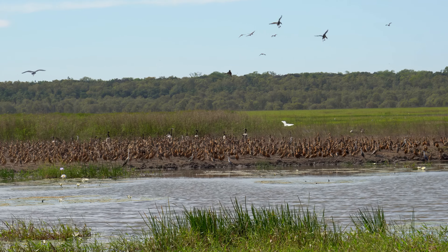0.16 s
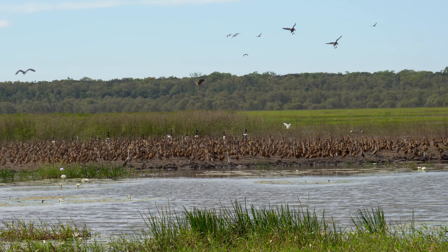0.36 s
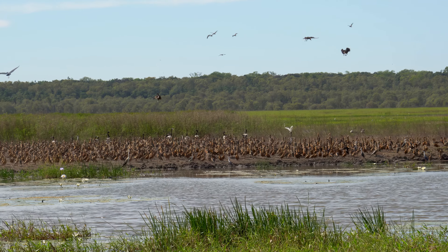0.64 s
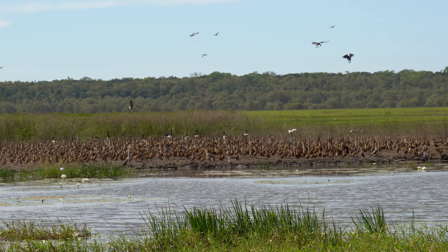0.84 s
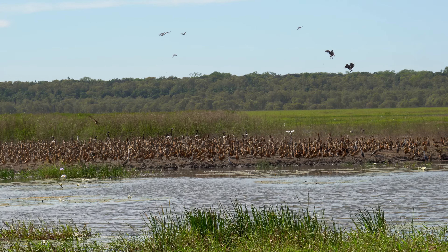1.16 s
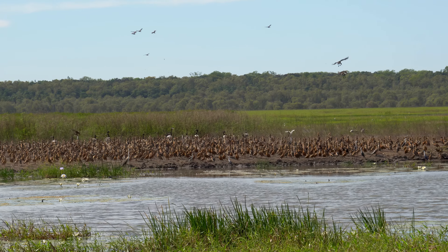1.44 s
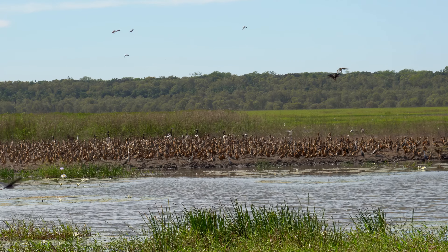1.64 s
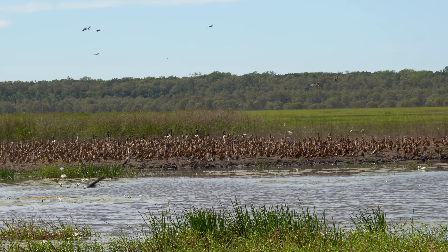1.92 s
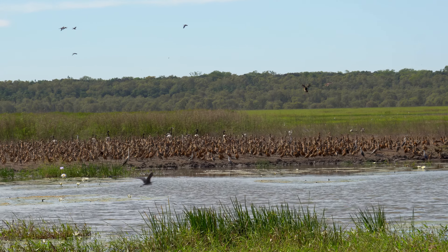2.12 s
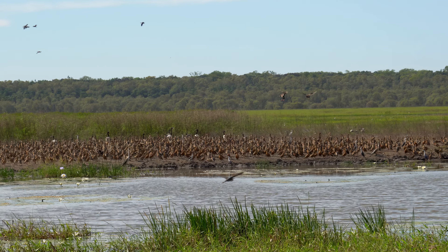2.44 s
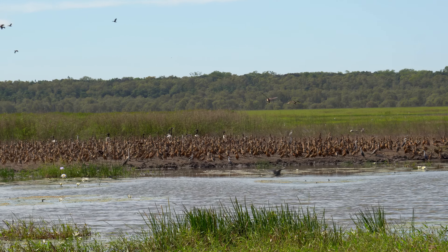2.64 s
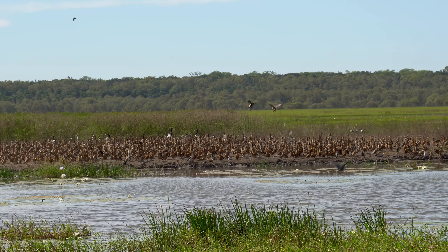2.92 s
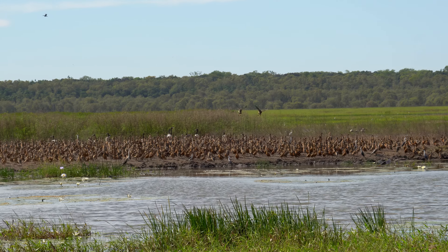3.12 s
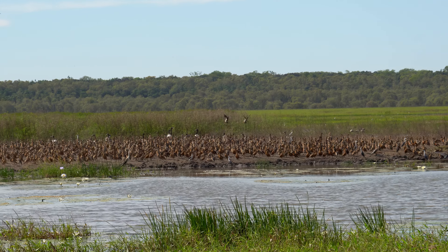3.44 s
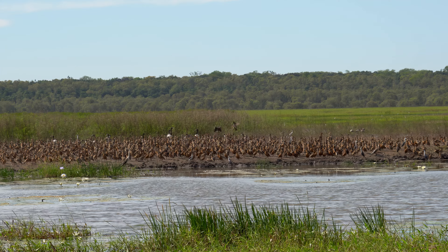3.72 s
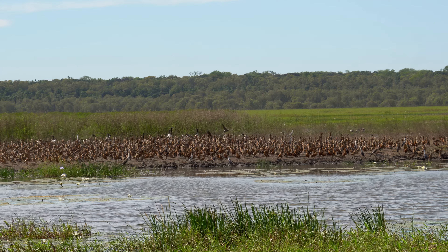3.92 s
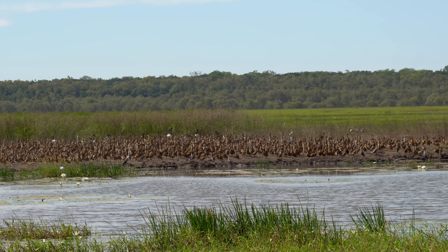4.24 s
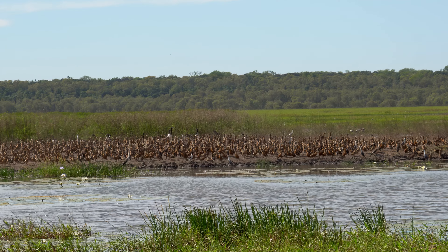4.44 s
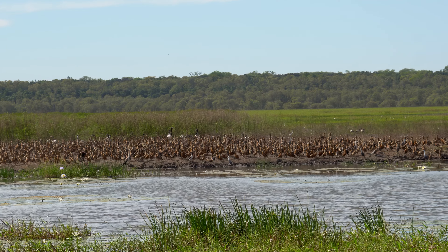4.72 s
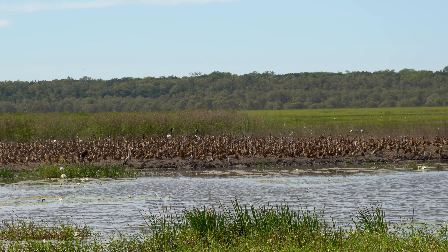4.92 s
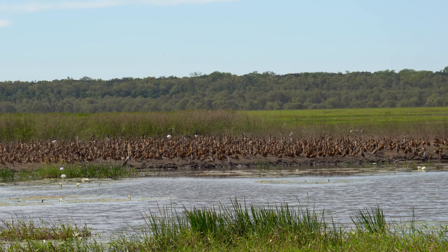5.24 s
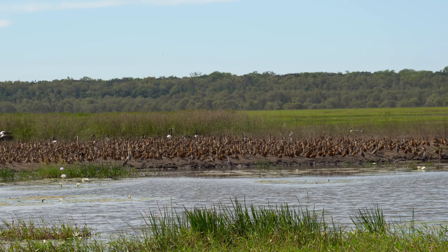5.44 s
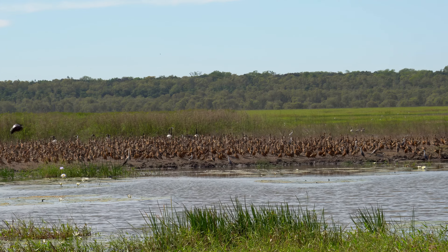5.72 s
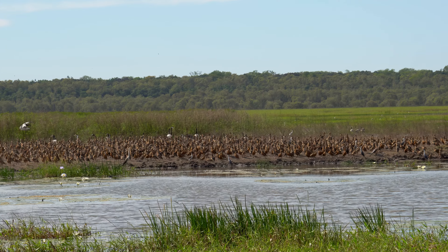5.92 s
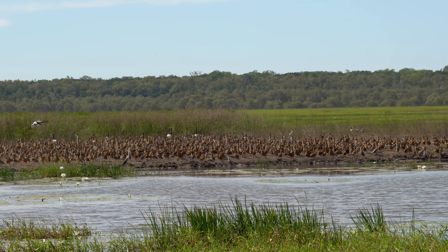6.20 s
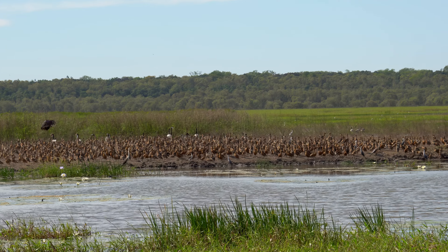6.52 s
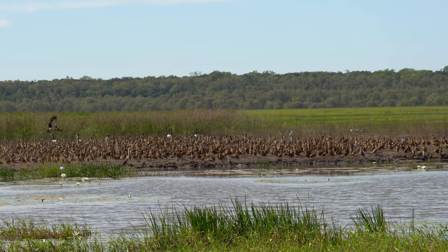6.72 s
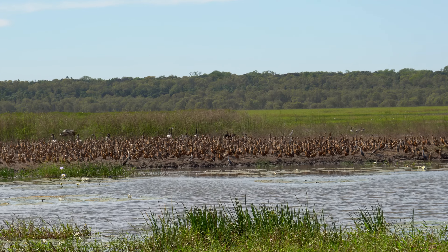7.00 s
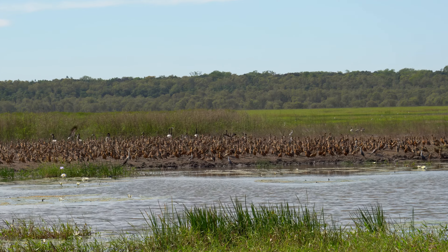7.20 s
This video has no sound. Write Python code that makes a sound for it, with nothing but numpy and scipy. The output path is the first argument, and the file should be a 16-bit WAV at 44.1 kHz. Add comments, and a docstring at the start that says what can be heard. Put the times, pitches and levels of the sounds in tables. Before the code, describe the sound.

Hundreds of ducks chip and whistle at once at an open wetland, nearest voices sharp and clear, with breeze rumbling softly on the microphone.

```python
"""Whistling ducks across open water

A huge flock rests on a mud bank: near birds twitter in arched chips and long rising-and-falling whistles,
each a nearly pure voice on a bending pitch; hundreds of scattered calls merge into a duller crowd behind.
Far waterbirds hoot, honk, chip and gabble from voices of a few partials. Shaped noise makes the breeze's
rumble on the microphone, a faint far drone and the steady air.
"""
import sys
import numpy as np
from scipy import signal
from scipy.fft import rfft, irfft
from scipy.io import wavfile

SR = 44100
rng = np.random.default_rng(int(sys.argv[2]) if len(sys.argv) > 2 else 0)


def digitize_waveform(pressure):
    """Quantize a signal to 16-bit integers and store it at the path in sys.argv[1].

    Rows of a 2-D input are taken as channels; values are limited to [-1, 1].
    """
    field = np.atleast_2d(pressure).T
    bounded = np.clip(field, -1, 1)
    quanta = np.round(bounded * 32767).astype(np.int16)
    wavfile.write(sys.argv[1], SR, quanta)


N = 324576
TIME = np.arange(N) / SR

# The crowd's swell and sink. Each row: time in seconds, drive of the high voices in dB, drive of the low in dB.
CROWD = [(0.0, -43, -54.5), (1.27, -40, -49), (1.73, -42.5, -51), (2.19, -41.5, -56), (2.53, -46, -50.5),
         (2.88, -35, -49.5), (2.99, -42.5, -45.5), (3.68, -39, -52.5), (3.8, -46, -53.5), (4.25, -40, -47),
         (4.6, -43.5, -51.5), (4.71, -39.5, -49.5), (5.64, -42.4, -50.5), (5.87, -49, -52.5),
         (6.21, -39, -45.5), (7.02, -40.5, -52), (7.13, -53, -54), (7.36, -39, -57.1)]
# Colour of the crowd after crossing the water. Each row: frequency in Hz, gain in dB.
CROWD_COLOUR = [(1200, 13), (1700, -1), (2150, 2.5), (3000, 3.5), (3600, 5), (4800, 3), (5600, 4.5),
                (6600, 0.5), (9000, -3), (12000, -5), (15000, -14)]
# A soft gabble of distant waterbirds. Each row: time in seconds, level in dB.
GABBLE = [(0, -59), (1.2, -61.5), (1.62, -58), (2.1, -64), (3.8, -62), (4.3, -61.5), (5.4, -61), (6.2, -64),
          (7.36, -67)]
# Strength of the breeze. Each row: time in seconds, rumble level in dB before the eddies.
BREEZE = [(0.0, -31.5), (0.23, -30), (0.35, -25), (0.58, -32.5), (1.15, -28.5), (1.73, -35), (2.07, -30.5),
          (2.19, -42.5), (2.42, -40), (2.65, -33.5), (3.22, -37.5), (3.91, -35), (4.37, -40), (5.17, -29.5),
          (5.52, -29.5), (5.64, -35.5), (6.44, -40.8), (7.36, -33.5)]
# Spectral shape of the breeze's rumble. Each row: frequency in Hz, relative density in dB per Hz.
RUMBLE = [(8.8, -51), (15, -1), (32, 1), (60, -3.5), (104, -11), (500, -43), (650, -85), (1100, -120)]
# A faint far drone near 220 Hz. Each row: time in seconds, level in dB.
DRONE = [(0, -59.5), (3.8, -60), (4.4, -59.5), (5.6, -58.5), (6.2, -55), (6.8, -55), (7.36, -59.5)]
# Spectral shape of the wetland's steady wash and the microphone's hiss.
# Each row: frequency in Hz, relative density in dB per Hz.
AIR = [(100, 8.5), (400, -3), (560, -7.5), (720, -4.5), (890, -0.5), (1100, -3), (1600, -7), (3000, -5.5),
       (7000, -22), (12000, -23), (15000, -26.5)]
# Near birds stutter runs of chips. Each row: first chip in seconds, last chip in seconds, number of chips,
# first pitch in Hz, last pitch in Hz, first level in dB, last level in dB.
CHIP_RUNS = [(0.043, .389, 4, 4640, 4540, -25, -29), (0.067, .321, 4, 3470, 3345, -33.5, -38.5),
             (0.485, .605, 2, 4320, 4470, -26, -33), (0.576, .668, 2, 4260, 4010, -29.5, -34),
             (0.9, 1.156, 4, 4500, 4135, -29.5, -32.5), (0.934, 1.128, 3, 3990, 4410, -39, -33),
             (1.237, 1.325, 2, 3600, 3430, -36.5, -50), (1.317, 1.42, 2, 4660, 4850, -37, -34),
             (1.494, 1.607, 2, 3620, 3490, -35.5, -36), (1.581, 1.66, 2, 2740, 2600, -39.5, -60),
             (1.899, 2.112, 2, 6040, 5980, -45.5, -45), (1.938, 2.208, 4, 3610, 3860, -37.5, -41),
             (2.603, 2.981, 3, 4490, 4570, -36.5, -34.5), (2.605, 3.072, 5, 3474, 3685, -38.5, -31.5),
             (2.763, 2.88, 2, 4700, 4500, -36.5, -40), (3.534, 3.64, 2, 3490, 3620, -35.5, -37),
             (4.003, 4.187, 3, 3840, 3650, -30, -32.5), (4.131, 4.32, 3, 3960, 3850, -35.5, -31.5),
             (4.339, 4.505, 3, 3360, 3650, -35, -34.5), (4.982, 5.165, 3, 3720, 3850, -34, -39),
             (5.13, 5.403, 2, 6600, 5840, -45, -44), (5.213, 5.414, 3, 3640, 3730, -33, -59),
             (5.67, 5.873, 3, 3850, 3470, -38, -41.5), (5.754, 5.934, 3, 4800, 4780, -34.5, -33),
             (5.988, 6.1, 3, 3570, 3810, -37.5, -37.5), (6.197, 6.275, 2, 3700, 3800, -41, -34),
             (6.405, 6.51, 2, 3640, 3590, -32, -30), (6.484, 6.574, 2, 3930, 3950, -37, -34.5),
             (6.59, 6.692, 2, 5050, 4400, -40, -37), (7.148, 7.345, 3, 3590, 3660, -42, -43),
             (7.3, 7.35, 2, 4930, 4860, -38.5, -35.5)]
# Near whistles. Each row: time of the top in seconds, rise in seconds, fall in seconds, top pitch in Hz,
# end pitch in Hz, level in dB, overtone in dB against the main tone before it breaks up.
WHISTLES = [(.09, 0.055, 0.062, 5750, 4740, -49, -24), (.426, 0.13, 0.013, 5800, 5700, -41.5, -40),
            (.46, 0.0078, 0.063, 5850, 4800, -44, -36), (.705, .01, 0.073, 4010, 3020, -37, -18),
            (.731, 0.051, 0.016, 5450, 5170, -44, -16), (.779, 0.023, 0.065, 4820, 3790, -37, -27),
            (.955, .11, .15, 5260, 3630, -41, -25), (1.04, 0.0057, 0.13, 3920, 2065, -44.5, -20),
            (1.345, 0.11, 0.017, 5680, 5620, -42.5, -31), (1.44, 0.084, 0.14, 5030, 3400, -40, -25),
            (1.775, 0.053, 0.086, 5960, 4620, -42.5, -19), (1.9, .02, 0.11, 4980, 3360, -36, -18),
            (2.295, 0.1, 0.11, 6230, 4300, -45, -39), (2.302, .13, 0.038, 4940, 3350, -41, -38),
            (2.485, 0.04, .05, 5340, 4730, -49, -20), (2.56, 0.042, 0.13, 5630, 4180, -45.5, -14),
            (2.84, 0.0079, 0.093, 3300, 1990, -44, -30), (2.866, .034, 0.11, 5370, 4460, -41, -17),
            (2.91, 0.027, 0.12, 3760, 2930, -47, -13), (3.16, 0.026, .1, 4130, 3070, -40.5, -15),
            (3.255, 0.045, 0.076, 5080, 4470, -38, -27), (3.4, .06, 0.067, 5470, 4500, -47, -20),
            (3.575, 0.048, .015, 5800, 5630, -40, -34), (3.634, 0.021, 0.084, 5170, 4240, -38, -23),
            (3.709, .06, 0.17, 5140, 2430, -44, -41), (4.006, .04, 0.13, 5570, 4120, -45.5, -17.5),
            (4.305, 0.038, 0.049, 6030, 4700, -41, -33), (4.436, 0.05, 0.016, 6120, 5700, -37.5, -39),
            (4.462, .01, .09, 6000, 4560, -38.5, -39), (4.47, .05, .17, 4150, 2440, -45, -20),
            (4.8, .05, 0.088, 4880, 3650, -41, -31), (4.84, .02, 0.096, 4030, 3060, -43.5, -14),
            (4.91, .07, .14, 5330, 3460, -38.5, -18), (5.12, 0.05, .15, 4840, 2780, -46.5, -11),
            (5.3, 0.07, 0.065, 5560, 4830, -40.5, -34), (5.5, 0.044, 0.16, 5600, 3100, -39, -32),
            (5.575, 0.07, 0.1, 5920, 4100, -41, -36), (5.981, 0.058, 0.094, 6350, 4850, -45.5, -36),
            (6.164, .07, .12, 5710, 3810, -43, -24), (6.385, 0.029, 0.057, 5180, 4010, -37.5, -19.5),
            (6.653, 0.15, 0.042, 5100, 3750, -42.5, -43), (6.936, 0.093, 0.1, 5320, 4000, -42.5, -30),
            (7.02, 0.011, 0.16, 4700, 3400, -46, -35), (7.06, .01, .06, 5160, 4400, -44, -40),
            (7.22, 0.029, 0.053, 5420, 4400, -39, -40)]
# One far bird hoots now and then. Each row: middle of the hoot in seconds, level in dB.
HOOTS = [(.32, -57), (1.52, -62), (2.14, -55.5), (2.69, -60), (3.14, -58), (3.70, -60.5), (4.17, -56.5),
         (4.71, -55)]
# Far low calls, single or in even runs: honks, a few low-pitched chips near 1.5 kHz, faint hoots near 330-400 Hz.
# Each row: first call in seconds, number of calls, pitch in Hz, level in dB.
FAR_CALLS = [(.528, 1, 1626, -57), (1.55, 1, 873, -56.5), (1.62, 1, 630, -56.5), (1.98, 1, 1500, -60),
             (2.13, 1, 930, -57), (3.56, 1, 910, -59), (3.95, 5, 916, -54), (4.84, 1, 874, -56),
             (5.05, 5, 896, -53), (5.84, 4, 850, -57), (6.26, 1, 326.5, -54.5), (6.47, 1, 1510, -57),
             (6.475, 3, 856, -56), (6.952, 1, 345, -60), (7.109, 1, 398, -59)]

CHIP_REACH_S = .025   # from a chip's top to either end
CHIP_LEAD = .13   # the full-strength stretch is centred this share of the reach before the top
CHIP_BEND, BEND_SPREAD = .33, 0.0598   # share of pitch lost at the ends, averaged over both; its scatter
CLIMB_SHARE, CLIMB_S = .2, .08   # a rise of this length starts this share below the top; longer rises lower
TURN_ROUNDNESS = .24   # 0 = the pitch turns in a sharp point
EASE = .35   # how far a slur flattens towards its ends
HOOT_HZ, HOOT_S = 278, 0.13   # the unheard fundamental of the lone bird's hoot, and its length
CALL_GAP_S = .145   # between the far calls of a run
EDDY_DB, EDDIES_PER_S = 1.66, 7.2   # quick swings within a gust
AIR_LOSS_HZ = 8100   # the air dulls the near calls' overtones above this
CUTOFF_HZ = 15100


def from_db(db):
    """Decibels to gain."""
    return 10 ** (np.asarray(db) / 20)


def rms_one(x):
    """Scale to rms 1."""
    return x / np.sqrt(np.mean(x ** 2) + 1e-20)


def in_time(rows):
    """Each column of a curve at every sample."""
    s, *columns = np.transpose(rows)
    return [np.interp(TIME, s, column) for column in columns]


def span(start, end):
    """The samples between two times."""
    return slice(int(np.clip(start * SR, 0, N)), int(np.clip(end * SR, 0, N)))


def coloured(x, points):
    """Filter by a curve of Hz and dB, joined evenly over log frequency."""
    hz, db = np.transpose(points)
    bins = np.maximum(np.arange(N // 2 + 1) * SR / N, 1)
    gain = from_db(np.interp(np.log(bins), np.log(hz), db))
    return irfft(rfft(x) * gain, N)


def drift(rate):
    """Smooth chance that changes about rate times a second; spread 1."""
    r = np.exp(-40 * np.pi * rate / SR)   # two equal poles, run on every 20th sample
    noise = rng.standard_normal(N // 20 + 2002)
    slow = signal.lfilter([1], [1, -2 * r, r * r], noise)[2000:]   # drop the filter's run-in
    return np.interp(np.arange(N) / 20, np.arange(len(slow)), rms_one(slow))


def tone(hz, second_db, third_db):
    """A nearly pure voice on a pitch track, with two overtones."""
    phase = (2 * np.pi * np.cumsum(hz) / SR).astype(np.float32)
    return np.sin(phase) + from_db(second_db) * np.sin(2 * phase) + from_db(third_db) * np.sin(3 * phase)


def off_water(x, lag_s, echo_db):
    """A second path glances off the ripples, fading in and out a moment after the direct sound."""
    delayed = np.interp(TIME - lag_s, TIME, x, left=0)
    return x + from_db(echo_db) * drift(22.7) * delayed


def scatter(x, t60):
    """Reeds and the bank throw back a thin, quickly dying wash."""
    t = TIME[:SR]
    tail = rng.standard_normal(SR) * from_db(-60 * t / t60) * (1 - np.exp(-t / 0.022))
    return signal.fftconvolve(x, tail / np.sqrt(np.sum(tail ** 2)))[:N]


def chips(rows, waver, flutter_db, fade, overtone_db):
    """The pitch arches, dropping faster than it climbed; the voice jumps to full strength on the way up."""
    out = np.zeros(N)
    wobble = 1 + waver * drift(125)
    for s, top_hz, bend, db in rows:
        at = span(s - CHIP_REACH_S, s + CHIP_REACH_S)
        u = (TIME[at] - s) / CHIP_REACH_S   # -1 at the start, 0 at the top, 1 at the end
        body = .16 + .84 / (1 + np.abs((u + CHIP_LEAD) / fade) ** 14)
        swell = body * np.clip(4 * (1 - np.abs(u)), 0, 1)
        hz = top_hz * (1 - bend * u ** 2 * (1 + .3 * u))
        out[at] += from_db(db) * swell * tone(hz * wobble[at], overtone_db, overtone_db - 13)
    return out * from_db(flutter_db * drift(98))


def whistles(rows, waver, rasp, flutter_db, edge_s):
    """A long slur climbs to a rounded peak and slides down, easing off; the voice catches at the turn."""
    out = np.zeros(N)
    wobble = 1 + waver * drift(19.3) + rasp * drift(670)
    grain_db = 4 * drift(90) - 2   # the first overtone breaks up more than the main tone
    for top, rise, fall, top_hz, end_hz, db, overtone_db in rows:
        at = span(top - rise, top + fall)
        t = TIME[at] - top
        start_hz = top_hz * (1 - CLIMB_SHARE * np.sqrt(rise / CLIMB_S))
        away = np.interp(t, [-rise, 0, fall], [1, 0, 1])   # 0 at the top, 1 at either end
        slope = (np.hypot(away, TURN_ROUNDNESS) - TURN_ROUNDNESS) / (np.hypot(1, TURN_ROUNDNESS) - TURN_ROUNDNESS)
        edge_hz = np.where(t < 0, start_hz, end_hz)
        hz = top_hz + (edge_hz - top_hz) * slope * (1 + EASE * (1 - slope))
        catch_db = -3.6 * np.exp(-(t / 0.0023) ** 2)
        edges = np.clip(np.minimum(t + rise, fall - t) / edge_s, 0, 1)
        voice = tone(hz * wobble[at], overtone_db + grain_db[at], overtone_db - 22)
        out[at] += from_db(db + catch_db) * edges * voice
    return out * from_db(flutter_db * drift(50))


def crowd_chips(low_hz, high_hz, spread_db, overtone_db, count):
    """Each bird stutters a run of four chips, about ten a second, sinking a little in pitch."""
    late, pitch_a, pitch_b, depth, far, pause = rng.random((count, 6, 1)).transpose(1, 0, 2)
    step = np.arange(4)
    first_s = (np.arange(count)[:, None] + 3 * late) / count * N / SR
    s = (first_s + step * (.085 + .035 * pause)) % (N / SR)   # late chips wrap to the start
    # the mean of two draws favours the middle of the range
    pitch = (low_hz + (high_hz - low_hz) * (pitch_a + pitch_b) / 2) * (1 - 0.0201 * step)
    db = -spread_db * np.sqrt(far) + rng.normal(0, 2.0, (count, 4))
    rows = np.stack(np.broadcast_arrays(s, pitch, 0.121 + .36 * depth, db), axis=-1).reshape(-1, 4)
    return rms_one(chips(rows, waver=0.0079, flutter_db=3.0, fade=0.83, overtone_db=overtone_db))


def crowd_whistles(low_hz, high_hz, spread_db, overtone_db, count):
    """Slurs follow each other loosely and cross, each falling for longer than it rises."""
    late, pitch_a, pitch_b, depth, far = rng.random((count, 5)).T
    top = (np.arange(count) + 4 * late - 2) / count * N / SR
    length = .07 + .13 * depth
    pitch = low_hz + (high_hz - low_hz) * (pitch_a + pitch_b) / 2
    end_hz = pitch * (.84 - .2 * depth)   # longer slurs fall further
    db = -spread_db * np.sqrt(far)
    rows = np.c_[top, .36 * length, .64 * length, pitch, end_hz, db, overtone_db - 8 * pitch_a]
    return rms_one(whistles(rows, waver=0.01373, rasp=0.0066, flutter_db=3.0, edge_s=0.025))


def crowd():
    """High and low voices merge by sheer number, then take on the colour of the water crossing."""
    high_db, low_db = in_time(CROWD)
    high = from_db(-9) * crowd_chips(low_hz=3102, high_hz=4800, spread_db=12.5, overtone_db=-22, count=140)
    high += from_db(-6) * crowd_whistles(low_hz=3400, high_hz=5850, spread_db=9, overtone_db=-20, count=240)
    # thin, shrill voices peep faintly among the rest
    high += from_db(-19) * crowd_chips(low_hz=4525, high_hz=7610, spread_db=6.0, overtone_db=-33, count=160)
    low = from_db(-3.0) * crowd_chips(low_hz=2013, high_hz=3200, spread_db=10.5, overtone_db=-4.5, count=120)
    low += from_db(-4) * crowd_whistles(low_hz=2400, high_hz=3500, spread_db=7, overtone_db=-22, count=130)
    return coloured(from_db(high_db) * high + from_db(low_db) * low, CROWD_COLOUR)


def gabble():
    """Many soft low notes overlap from far across the marsh."""
    level_db, = in_time(GABBLE)
    return from_db(level_db) * crowd_chips(low_hz=419.0, high_hz=1298.5, spread_db=6, overtone_db=-5, count=130)


def breeze():
    """Eddies on the microphone swell and sink with the gusts."""
    gust_db, = in_time(BREEZE)
    rumble = rms_one(coloured(rng.standard_normal(N), RUMBLE))
    return from_db(gust_db + EDDY_DB * drift(EDDIES_PER_S)) * rumble


def drone():
    """A narrow band of noise makes an unsteady low hum from far across the marsh."""
    level_db, = in_time(DRONE)
    band = signal.butter(2, [205, 235], "band", fs=SR, output="sos")
    return from_db(level_db) * rms_one(signal.sosfilt(band, rng.standard_normal(N)))


def steady_air():
    """Shaped noise gives the wash of the wetland and the microphone's hiss."""
    return from_db(-52.5) * rms_one(coloured(rng.standard_normal(N), AIR))


def near_chips():
    """Each bird repeats its chip evenly; pitch and strength slide from the first chip to the last."""
    runs = []
    for first_s, last_s, count, first_hz, last_hz, first_db, last_db in CHIP_RUNS:
        first, last = (first_s, first_hz, first_db), (last_s, last_hz, last_db)
        runs.append(np.linspace(first, last, int(round(count))))
    s, hz, db = np.concatenate(runs).T
    bend = CHIP_BEND + BEND_SPREAD * rng.standard_normal(len(s))
    return chips(np.c_[s, hz, bend, db], waver=0.0094, flutter_db=1.15, fade=0.53, overtone_db=-35.5)


def ducks():
    """Near callers stand clear of the duller crowd; water and bank reflect them all."""
    near = near_chips() + whistles(WHISTLES, waver=.007, rasp=.007, flutter_db=2.4, edge_s=.01)
    near = signal.sosfilt(signal.butter(2, AIR_LOSS_HZ, fs=SR, output="sos"), near)
    flock = off_water(near + crowd(), lag_s=.0035, echo_db=-9)
    return flock + from_db(-15) * scatter(flock, t60=.3)


def far_birds():
    """A lone bird hoots by its second and third partials; short sagging low calls come singly or in even runs."""
    out = np.zeros(N)
    wobble = 1 + 0.02 * drift(50)
    for s, db in HOOTS:
        at = span(s - HOOT_S / 2, s + HOOT_S / 2)
        swell = from_db(db) * np.cos(np.pi * (TIME[at] - s) / HOOT_S)
        phase = 2 * np.pi * np.cumsum(HOOT_HZ * wobble[at]) / SR
        out[at] += swell * (np.sin(2 * phase) + from_db(-3.5) * np.sin(3 * phase))
    for first, count, hz, db in FAR_CALLS:
        for s in first + CALL_GAP_S * np.arange(round(count)):
            at = span(s - .045, s + 0.0441)
            u = np.linspace(-1, 1, at.stop - at.start)
            sag = 1 - 0.06 * u - 0.078 * u ** 2
            pitch = hz * rng.normal(1, 0.0207) * wobble[at] * sag
            out[at] += from_db(db) * np.cos(u * np.pi / 2) * tone(pitch, second_db=-13.5, third_db=-38)
    return out


def scene():
    """Flock, far birds, breeze, drone and the steady air, in one channel."""
    far = far_birds() + gabble()
    far = far + from_db(-1) * scatter(far, t60=0.26)
    return (ducks() + far + breeze() + drone() + steady_air())[None]


def record(dry):
    """A steep low-pass cuts the top."""
    return signal.sosfilt(signal.ellip(12, .1, 80, CUTOFF_HZ, fs=SR, output="sos"), dry)


dry = scene()
out = record(dry)
digitize_waveform(out)
```